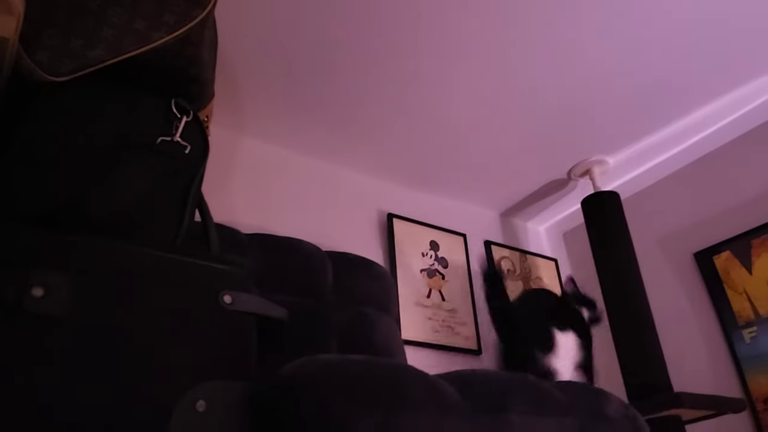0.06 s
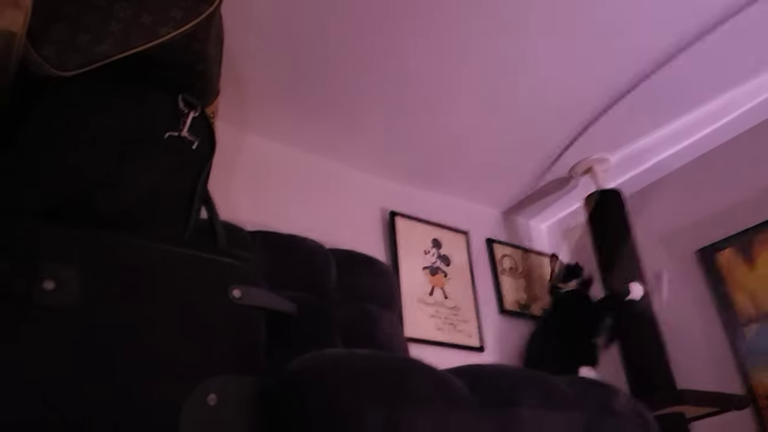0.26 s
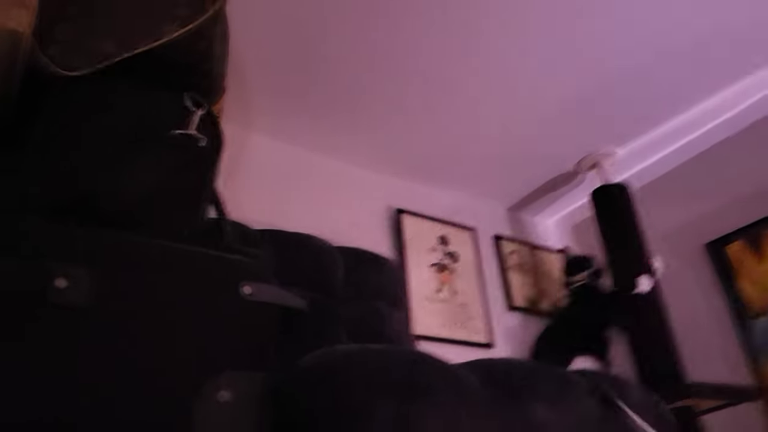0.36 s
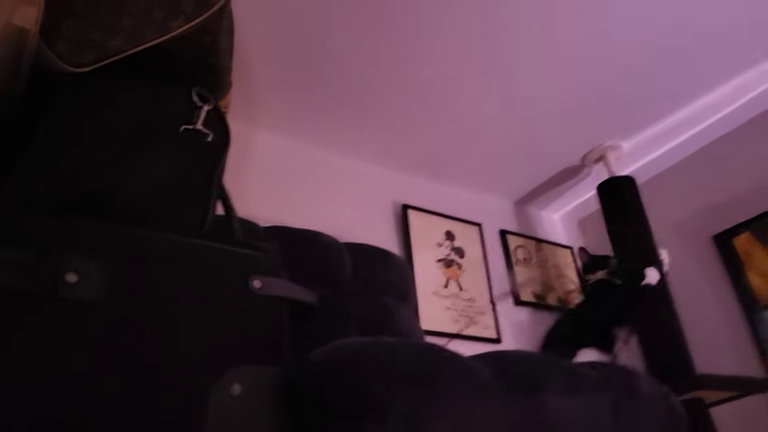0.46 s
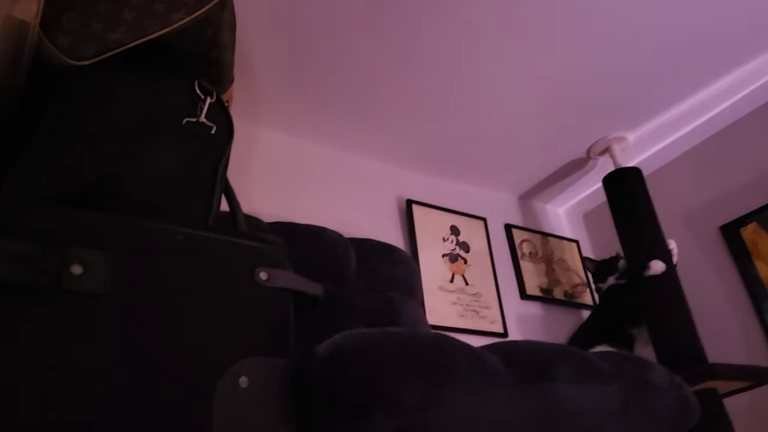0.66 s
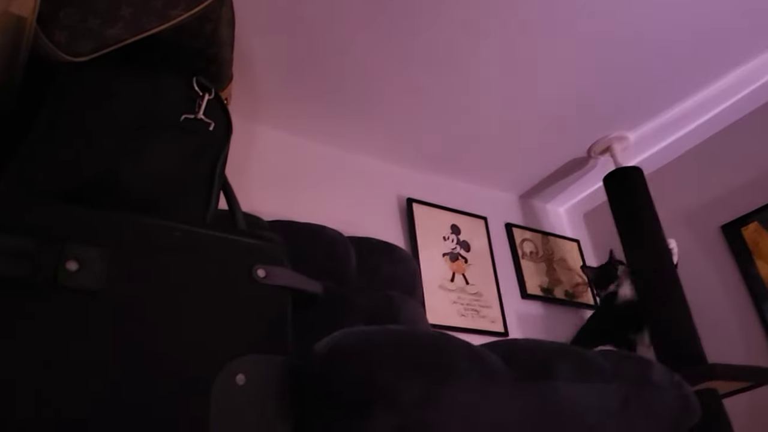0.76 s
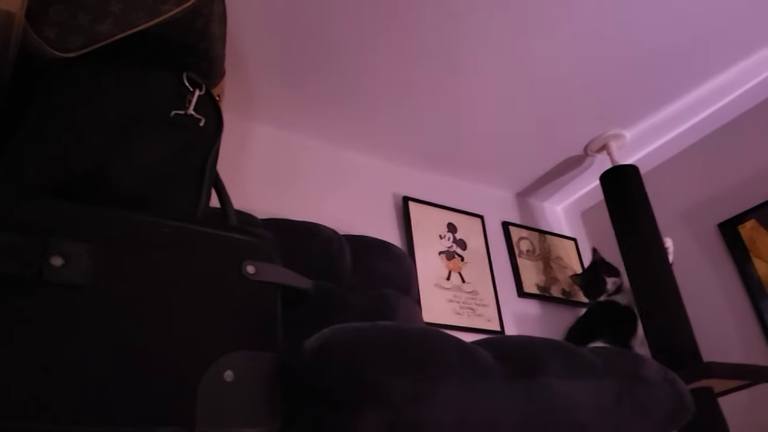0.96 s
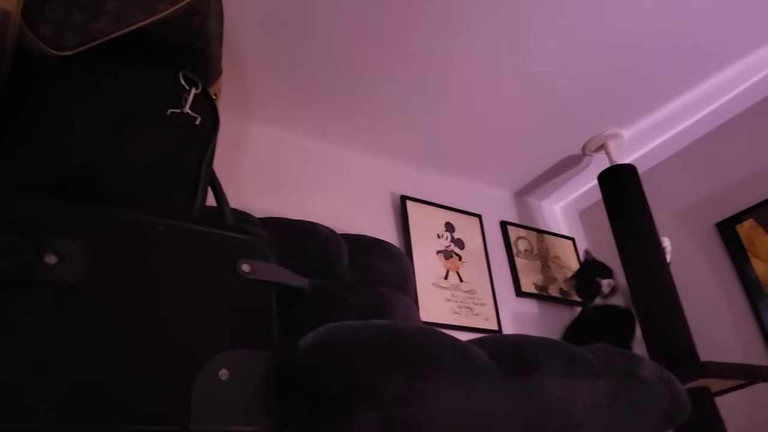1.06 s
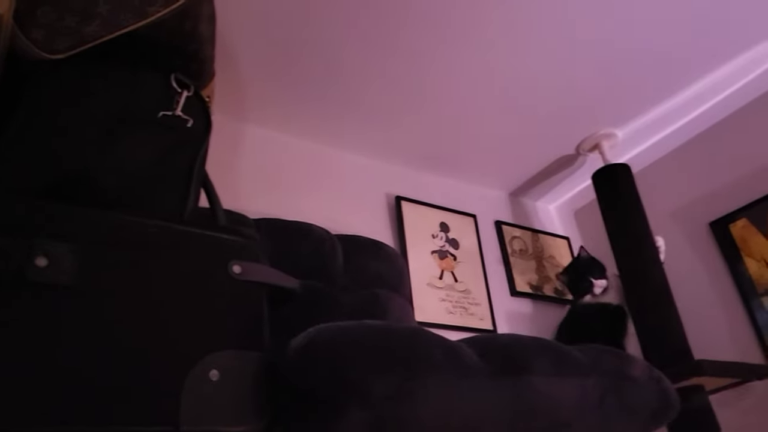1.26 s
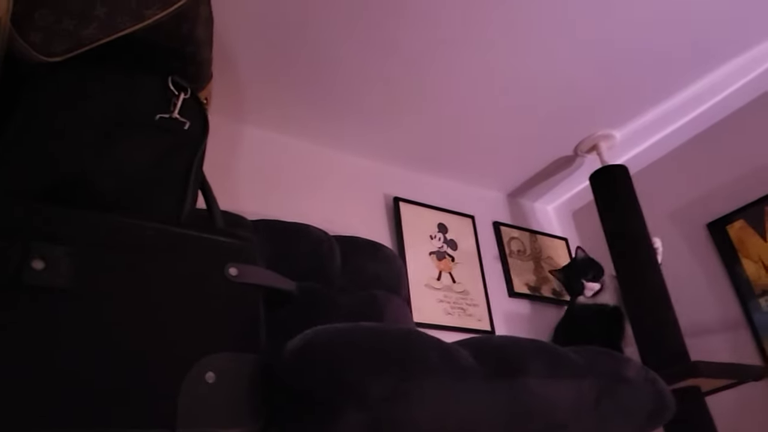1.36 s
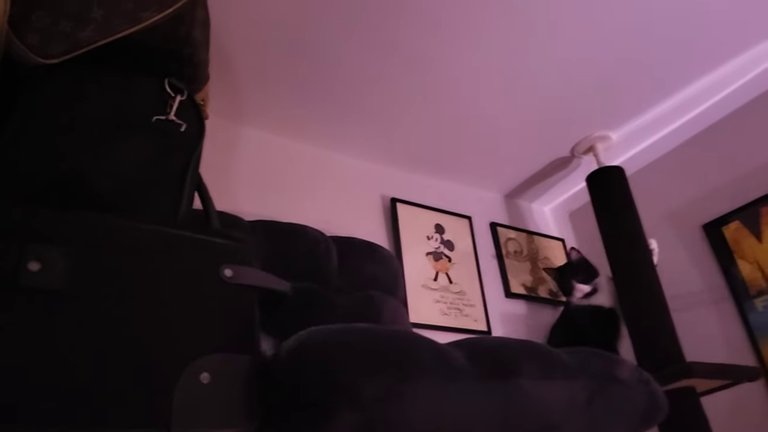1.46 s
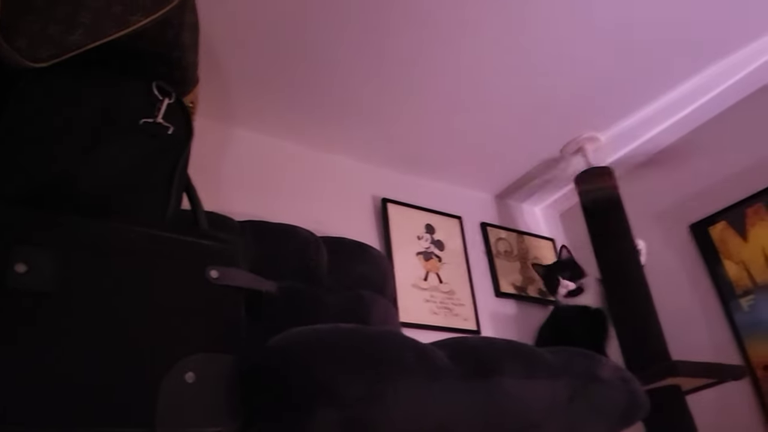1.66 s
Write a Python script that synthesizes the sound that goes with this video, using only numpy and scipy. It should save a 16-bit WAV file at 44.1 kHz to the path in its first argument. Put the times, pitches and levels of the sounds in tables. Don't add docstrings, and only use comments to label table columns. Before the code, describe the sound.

One sharp knock with a low thud, followed by soft fabric rustles, tiny ticks and a brief scrape

```python
import sys
import numpy as np
from scipy import signal
from scipy.fft import rfft, irfft
from scipy.io import wavfile
from scipy.ndimage import map_coordinates

SR = 44100
rng = np.random.default_rng(int(sys.argv[2]) if len(sys.argv) > 2 else 0)


def master_out(mix):
    frames = np.transpose(np.atleast_2d(mix))
    ceiling = np.clip(frames, -1, 1)
    pcm = np.round(ceiling * 32767).astype(np.int16)
    wavfile.write(sys.argv[1], SR, pcm)


def voltage_ratio(decibels):
    exponent = np.asarray(decibels, float) / 20
    return 10 ** exponent


N = 74970

# f/Hz, level/dB per Hz
AIR_SPECTRUM = [(30, -14.5), (80, -9.5), (350, -23), (1000, -34.5), (2500, -34), (5000, -46), (9000, -49),
                (14000, -46.5)]
# f/Hz, width/Hz, level/dB
HOUSE_HUMS = [
    (40, 18, -70),
    (132.7, 23, -68),
    (372, 120, -85.5),
]
# f/Hz, likeness/1
AIR_LIKENESS = [(30, 0.65), (150, 0.59), (600, 0.17), (2000, 0.18), (8000, 0.09)]
# f/Hz, left minus right/dB
CASE_SHADE = [(60, 1), (130, -1.5), (290, 1), (640, -0.5), (1410, 1.5), (3100, 9), (6820, -4.5),
              (15000, 1.5)]
# t/s, peak level/dB, f/Hz, length/s
WEIGHT_SHIFTS = [(.0, -48.5, 45, 0.021), (0.06, -47, 47.3, 0.024), (0.154, -48, 292, 0.012),
                 (.216, -27, 258.8, .01), (0.222, -27, 107, 0.035), (0.243, -23.5, 48.3, 0.034),
                 (0.2682, -17, 56.2, 0.025), (0.269, -37.5, 240, 0.047), (.295, -42, 118, 0.052),
                 (0.3173, -29, 40.2, 0.067), (0.379, -46, 263, 0.043), (0.402, -43.5, 40, 0.035),
                 (0.452, -58, 48.6, 0.11), (0.554, -50.5, 145, 0.0416), (.556, -52, 95, 0.044),
                 (.535, -57.5, 50, .03), (.095, -60, 42, 0.099), (.69, -49, 169, 0.028),
                 (0.554, -45, 41.4, 0.11), (0.679, -52.5, 346, 0.016), (0.687, -47, 96, 0.067),
                 (0.692, -57, 43.4, 0.2), (0.713, -60, 280.7, 0.091), (0.788, -69.5, 357, 0.12),
                 (1.109, -70, 350.5, 0.037), (1.443, -57, 60.7, 0.039), (1.54, -50.5, 139, 0.023)]
# t/s, length/s, level/dB, brightness/dB per octave
STROKES = [(0, 0.032, -63, -4.5), (0.008, 0.048, -85, 9), (0.05, 0.14, -82, 4), (0.144, 0.04, -60.5, -3),
           (0.168, 0.13, -49, -2.5), (0.195, 0.022, -60.5, -5.5), (0.211, 0.025, -32, -2.5),
           (0.227, 0.045, -41.5, -3.5), (0.258, 0.029, -50.5, -1), (0.3, 0.04, -59, -3.5),
           (0.356, 0.046, -62.5, -4), (.382, 0.011, -62, 2), (0.398, 0.041, -69, -5),
           (0.424, 0.038, -74, -2.5), (0.47, 0.064, -72, -3), (0.541, 0.027, -65.5, -7),
           (0.598, 0.13, -72.5, -2), (0.662, 0.11, -76.5, 1.5), (0.728, 0.032, -73.5, 6.5),
           (0.768, 0.058, -83.5, 3.5), (1.105, 0.043, -70, -3.5), (1.286, 0.25, -80, 4.5),
           (1.5153, 0.041, -45.5, 3), (1.559, 0.03, -45.5, 0.5), (1.589, 0.036, -66, 6.5),
           (1.605, 0.065, -75.5, 3.5)]
# f/Hz, level/dB per Hz
PILE_SPECTRUM = [(250, -2.5), (650, -11), (1600, -2.5), (4000, -10), (7500, -15), (9800, -33),
                 (12000, -26.5), (15000, -26.5)]
# t/s, length/s, level/dB, start f/Hz, end f/Hz
PILE_SCUFFS = [(0.022, 0.057, -70, 5524, 6240), (0.336, 0.051, -63, 4200, 3810),
               (0.389, 0.036, -67.5, 1112, 706), (0.427, 0.108, -74.5, 1500, 1715),
               (0.102, 0.1, -75.5, 342, 331), (0.467, 0.085, -73.5, 2140, 2060),
               (0.483, 0.031, -86, 3280, 3200), (0.54, 0.0391, -67.5, 855, 345),
               (0.741, 0.066, -68.5, 2081, 2100), (1.122, 0.053, -72, 400, 485.4),
               (1.283, 0.085, -79.5, 1415, 1409), (1.509, 0.011, -63, 2986, 3030),
               (1.524, .04, -50.5, 4000, 3530), (1.551, 0.069, -53, 13970, 14500),
               (1.573, 0.041, -55.5, 2221, 1696), (1.582, 0.069, -68.5, 475, 331)]
# t/s, peak level/dB, low pluck level/dB
CLAW_SNAGS = [(0.0272, -52, -2), (.034, -79, 12), (.404, -66, -22), (0.598, -74, -5.5), (.6525, -56, -28),
              (0.6641, -42.5, -10), (0.6738, -41.5, -21), (.7095, -51, -23), (0.7357, -61, -27),
              (0.7523, -49.5, -25), (.774, -64, -10), (.804, -74, -4), (0.842, -69, 1), (1.119, -68.5, -13)]
# f/Hz, level/dB, t60/s
POST_MODES = [(770, -12.5, 0.0092), (1030, -17.5, 0.023), (1255, -13, 0.027), (1286, 0, .015),
              (1500, -3.5, 0.018), (1740, -7, 0.0017), (2180, -9.5, .015), (2570, -2.5, 0.024),
              (3350, -6, 0.011), (3730, 2.5, .008), (5864, 0, 0.011), (7110, -2, 0.0031),
              (13500, -19, .0021)]
# t/s, peak level/dB, rattle length/s, favoured f/Hz
POST_KNOCKS = [(0.0147, -49, 0.0014, 3320), (.0204, -49, 0.00057, 6240), (.152, -88, 0.0047, 913),
               (0.2143, -9, 0.0022, 1680), (0.2154, -17, 0.0038, 3350), (.2158, -12, 0.0031, 1122),
               (.2185, -17, 0.0019, 1030), (.2205, -14, 0.0017, 1530), (0.2216, -21, 0.0035, 1315),
               (0.226, -45, 0.0032, 1310), (.236, -24, 0.0064, 1525), (0.2332, -29, 0.014, 2390),
               (0.31, -61.5, .006, 1510), (.383, -65, 0.013, 755), (.384, -49, 0.0053, 1430),
               (0.524, -55.5, .006, 1080), (0.541, -65, 0.0082, 805), (0.596, -57.5, .004, 1510),
               (0.6744, -57, .004, 1366), (0.679, -65, 0.0023, 1910), (.7018, -46.5, .003, 1530),
               (0.7043, -51.5, 0.0018, 2080), (0.736, -43, 0.0011, 1170), (0.7387, -40.5, 0.0017, 2060),
               (0.7386, -45, 0.0024, 770), (.7475, -58, .003, 1275), (0.756, -54, 0.011, 1150),
               (0.942, -67, 0.009, 2342), (1.099, -67, 0.0036, 1000), (1.1181, -49.5, 0.0017, 1664),
               (1.12, -53.5, 0.0031, 2252), (1.122, -51.5, .004, 1400), (1.121, -56, 0.0062, 770),
               (1.127, -59, 0.0031, 1574), (1.5167, -33, 0.0025, 2500), (1.518, -27, 0.0032, 3530),
               (1.522, -45, 0.0057, 1080), (1.5245, -21.5, 0.0025, 3740), (1.525, -37.5, 0.00089, 5650),
               (1.526, -36, 0.0013, 2580), (1.533, -43, 0.0024, 1350), (1.541, -37.5, 0.012, 1360),
               (1.543, -34, 0.0058, 4100), (1.559, -34, 0.0072, 2620), (1.565, -38.5, 0.0034, 3300),
               (1.567, -35.5, 0.0029, 1550), (1.5837, -33, .001, 1533), (1.5856, -48, 0.0061, 1706),
               (1.589, -38, 0.0036, 2160), (1.608, -46.5, .005, 1740)]

RAKE_FROM_S = 1.4
RUB_LIKENESS = 0.31


def at_hz(points, hz):
    x, y = np.array(points).T
    return np.interp(np.log(hz), np.log(x), y)


def rms_one(x):
    return x / np.sqrt(np.mean(x ** 2) + 1e-20)


def ring(x, hz, t60):
    r = voltage_ratio(-60 / (max(t60, .001) * SR))
    w = 2 * np.pi * hz / SR
    return signal.lfilter([0, np.sin(w)], [1, -2 * r * np.cos(w), r * r], x + 1e-18)


def sway(x, cutoff_hz):
    r = np.exp(-2 * np.pi * cutoff_hz / SR)
    return signal.lfilter([1], [1, -2 * r, r * r], x)


def bandpass(x, order, low_hz, high_hz):
    return signal.sosfilt(signal.butter(order, [low_hz, high_hz], "band", fs=SR, output="sos"), x)


def swell(progress):
    return np.sin(np.pi * np.clip(progress, 0, 1))


def bands(x, low_hz, octaves):
    edges = low_hz * 2 ** np.arange(0, octaves, 1 / 3)
    for k, (low, high) in enumerate(zip(edges, edges[1:])):
        yield np.sqrt(low * high), bandpass(x[k % 2], 2, low, high)


def spread(mid, side, alike):
    alike = np.clip(alike, 0, 1)
    return np.sqrt(1 + alike) * mid + np.sqrt(1 - alike) * side * [[1], [-1]]


def air():
    white, out = rng.standard_normal((2, 2, N)), 0
    for hz, (mid, side) in bands(white, 27, 9.4):
        out = out + voltage_ratio(at_hz(AIR_SPECTRUM, hz)) * spread(mid, side, at_hz(AIR_LIKENESS, hz))
    out = voltage_ratio(-71.5) * rms_one(out)
    for hz, width_hz, db in HOUSE_HUMS:
        hum = ring(rng.standard_normal(2 * N), hz, 11.0 / width_hz)[N:]
        out = out + voltage_ratio(db) * rms_one(hum)
    return out


def room(x):
    t60_s, wall_cut_hz = .13, 3500
    t = np.arange(SR // 3) / SR
    white = rng.standard_normal((2, len(t)))
    dull = np.exp(-2 * np.pi * wall_cut_hz / SR)
    low = signal.lfilter([1 - dull], [1, -dull], white)
    tail = low * voltage_ratio(-60 * t / t60_s) + (white - low) * voltage_ratio(-120 * t / t60_s)
    tail = tail * np.clip(t / 0.0011, 0, 1)
    tail = tail / np.sqrt(np.sum(tail ** 2) / 2)
    return signal.fftconvolve(x[None], tail, axes=1)[:, :N]


def shaded(pair):
    rake_pan_db = 2
    lean = voltage_ratio(at_hz(CASE_SHADE, np.arange(1, N // 2 + 2) * SR / N) / 2)
    leaning = irfft(rfft(pair) * [lean, 1 / lean], N)
    panned = pair * voltage_ratio([[rake_pan_db], [-rake_pan_db]])
    return np.where(np.arange(N) > RAKE_FROM_S * SR, panned, leaning)


def placed(x):
    post_lag_s, rake_lag_s, lag_up_to_hz = 0.00017, -0.000088, 13000
    n = np.arange(N)
    low = signal.sosfiltfilt(signal.butter(2, lag_up_to_hz, fs=SR, output="sos"), x)
    lag_s = np.where(n > RAKE_FROM_S * SR, rake_lag_s, post_lag_s)
    late = map_coordinates(low, [n - lag_s * SR], order=3) + x - low
    return np.array([late, x])


def pushes():
    rough_from_hz, rough_share = 250, .55
    out, t = np.zeros(N), np.arange(N) / SR
    for s, db, hz, length in WEIGHT_SHIFTS:
        rough = rough_share * hz / (hz + rough_from_hz)
        noise = rms_one(bandpass(rng.standard_normal(N), 1, hz / 1.5, hz * 1.5))
        wave = (1 - rough) * np.sin(2 * np.pi * hz * (t - s)) - rough * noise
        out -= voltage_ratio(db) * swell((t - s) / length) * wave
    return out


def rubs():
    grains_per_s, grain_spread_db, grain_share = 5000, 2.5, .45
    attack_s, long_stroke_ease, release_db_per_s = .002, 1.8, 900
    clump_db, clumps_per_s = 1.5, 90
    t = np.arange(N) / SR
    struck = rng.random(N) < grains_per_s / SR
    sizes = voltage_ratio(grain_spread_db * np.minimum(rng.exponential(1, N), 4))
    grains = struck * sizes * rng.standard_normal((2, 3, N))
    source = grain_share * rms_one(grains) + (1 - grain_share) * rng.standard_normal((2, 3, N))

    shapes = []
    for s, length, db, _ in STROKES:
        attack = np.clip((t - s) / (attack_s + long_stroke_ease * length ** 2), 0, 1)
        shapes.append(attack * voltage_ratio(db - release_db_per_s * np.maximum(t - s - length, 0)))
    clumps = rms_one(sway(rng.standard_normal(N), clumps_per_s))
    shapes = np.array(shapes) * voltage_ratio(clump_db * clumps)

    tilts, out = np.array(STROKES)[:, 3], 0
    for hz, band in bands(source, 135, 7.1):
        power = voltage_ratio(2 * tilts * np.log2(hz / 1500)) @ shapes ** 2
        out = out + voltage_ratio(at_hz(PILE_SPECTRUM, hz) + 14) * np.sqrt(power) * band
    return out


def scuffs():
    width_share = .3
    out, t = np.zeros(N + SR), np.arange(4096) / SR
    for s, length, db, from_hz, to_hz in PILE_SCUFFS:
        white = rng.standard_normal((2, 8192))
        wander = rms_one(sway(white, width_share * from_hz / 2)[:, len(t):])
        along = np.clip(t / length, 0, 1)
        phase = 2 * np.pi * np.cumsum(from_hz + (to_hz - from_hz) * along) / SR
        tone = wander[0] * np.cos(phase) + wander[1] * np.sin(phase)
        i = int(s * SR)
        out[i:i + len(t)] += voltage_ratio(db) * swell(np.sqrt(along)) * tone
    return out[:N]


def snags():
    centre_hz, width_hz, pluck_hz, burst_s = 12000, 4000, 3400, .0005
    out, t = np.zeros(N + SR), np.arange(400) / SR
    for s, db, low_db in CLAW_SNAGS:
        burst = rng.standard_normal(len(t)) * t / burst_s * np.exp(-t / burst_s)
        high = bandpass(burst, 1, centre_hz - width_hz / 2, centre_hz + width_hz / 2)
        low = ring(burst, pluck_hz, 0.017)
        snag = high / np.abs(high).max() + voltage_ratio(low_db) * low / np.abs(low).max() + voltage_ratio(-50) * burst
        i = int(s * SR)
        out[i:i + len(t)] += voltage_ratio(db) * snag
    return out[:N]


def knocks():
    rattle_per_s, rattle_spread_db, detune = 3000, 6, .04
    favour_db_per_oct, low_cut_hz = 16, 620
    spot_db, spot_cycles = 3.5, 16
    out, t = np.zeros(N + SR), np.arange(1024) / SR
    for s, db, length, favoured_hz in POST_KNOCKS:
        draw = rng.random((len(POST_MODES) + 2, 1024))
        contacts = (draw[0] < rattle_per_s / SR) | (t == 0)
        force = swell((t + length / 5) / (1.2 * length))
        hits = contacts * force * voltage_ratio(rattle_spread_db * (draw[1] - .5))
        body = voltage_ratio(spot_db) * ring(np.pad(hits, (0, 3000)), favoured_hz, spot_cycles / favoured_hz)
        for chance, (hz, mode_db, t60) in zip(draw[2:], POST_MODES):
            signed = np.pad(hits * np.sign(chance - .5), (0, 3000))
            mode = ring(signed, hz * (1 + detune * (chance[-1] - .5)), t60)
            body += voltage_ratio(mode_db - favour_db_per_oct * abs(np.log2(hz / favoured_hz))) * mode
        i = int(s * SR)
        out[i:i + len(body)] += voltage_ratio(db) * body / np.abs(body).max()
    return signal.sosfilt(signal.butter(2, low_cut_hz, "high", fs=SR, output="sos"), out[:N] + 1e-18)


def scene():
    shared, *own = rubs()
    hard = knocks() + snags() + scuffs()
    cat = placed(hard + np.sqrt(RUB_LIKENESS) * shared + pushes())
    cat = cat + np.sqrt(1 - RUB_LIKENESS) * np.array(own)
    return shaded(cat) + voltage_ratio(-8) * room(hard) + air()


def band_limit(x):
    return signal.sosfilt(signal.butter(12, 16300, fs=SR, output="sos"), x)


def record(dry):
    top_hz = 15900
    cut = signal.sosfilt(signal.cheby2(10, 30, top_hz * 1.03, fs=SR, output="sos"), dry)
    return band_limit(cut)


dry = scene()
out = record(dry)
master_out(out)
```